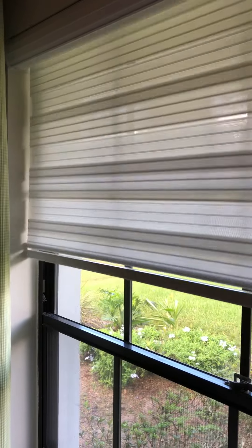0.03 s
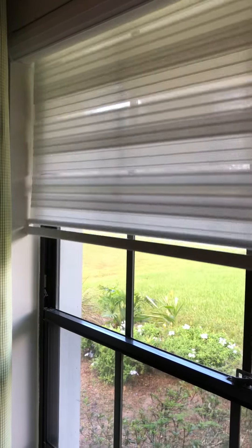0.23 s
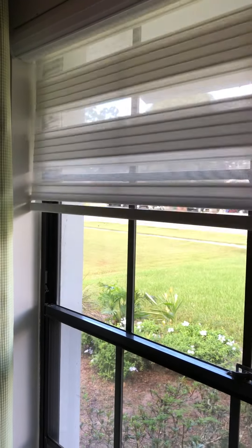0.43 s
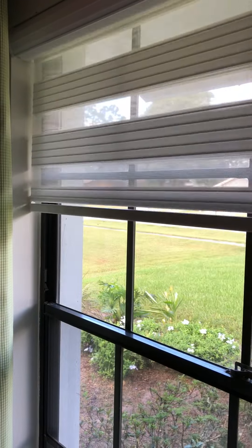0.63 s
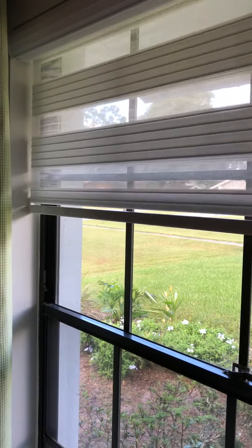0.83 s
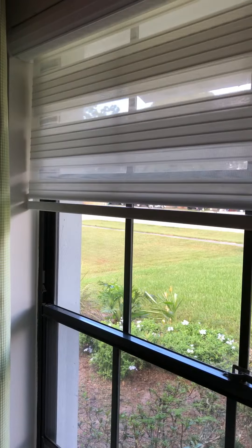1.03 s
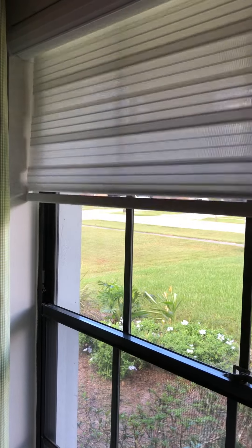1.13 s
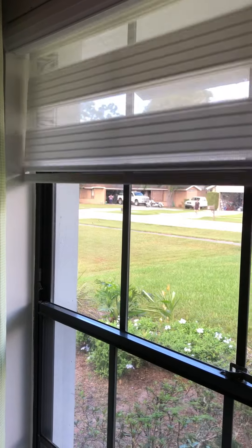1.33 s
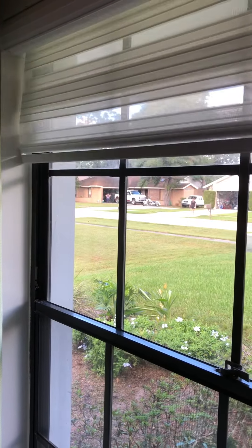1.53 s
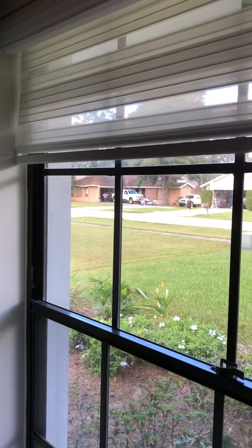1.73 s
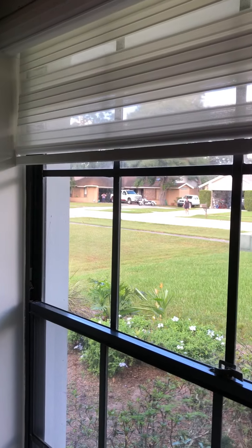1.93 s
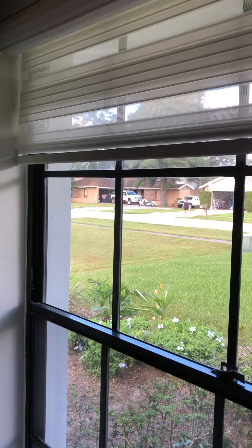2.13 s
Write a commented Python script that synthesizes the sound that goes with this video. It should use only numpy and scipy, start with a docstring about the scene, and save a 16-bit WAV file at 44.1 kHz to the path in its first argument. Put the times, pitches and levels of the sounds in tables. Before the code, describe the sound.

A roller window shade is pulled up in two rattling, ticking pulls, each ending in a knock

```python
"""Roller shade raised by bead chain

Two pulls in a small quiet room: beads tick as decaying modes, random slips excite the roller's resonances,
and fabric and chain hiss as fine grains. After each pull the mechanism catches with a knock of damped
frame modes and clicks of band noise. The tube thrums and the bearing chirps as swelling tones."""
import sys
import numpy as np
from scipy import signal
from scipy.fft import rfft, irfft, next_fast_len
from scipy.io import wavfile
from scipy.ndimage import uniform_filter1d

SR = 44100
rng = np.random.default_rng(int(sys.argv[2]) if len(sys.argv) > 2 else 0)


def materialize(psi):
    """Save the field psi as 16-bit PCM at rate SR to the path in sys.argv[1].

    A 1-D psi becomes a single channel; in a 2-D psi each row is a channel.
    """
    bounded = np.clip(np.atleast_2d(psi).T, -1, 1)
    quanta = np.round(bounded * 32767).astype(np.int16)
    wavfile.write(sys.argv[1], SR, quanta)


N = 97020  # samples, 2.2 s


def amp(db):
    """Decibels to gain."""
    return 10 ** (np.asarray(db) / 20)


def unit(x):
    """Scale to rms 1."""
    return x / np.sqrt(np.mean(x ** 2) + 1e-20)


def along(points, hz):
    """Interpolate (Hz, value) points on a log frequency axis."""
    f, v = np.transpose(points)
    return np.interp(np.log(hz + 1), np.log(f + 1), v)


def clock():
    """Time of each sample, s."""
    return np.arange(N) / SR


def level(rows):
    """Gain per sample from (s, dB) points, silent outside them."""
    s, db = np.transpose(rows)
    return amp(np.interp(clock(), s, db, left=-np.inf, right=-np.inf))


def filtered(x, response):
    """Multiply the spectrum of x by a complex response of frequency."""
    m = next_fast_len(N + SR // 2)
    hz = np.fft.rfftfreq(m, 1 / SR)
    return irfft(rfft(x, m) * response(hz), m)[:N]


def coloured(x, points):
    """Shape x by (Hz, dB) points, at rms 1."""
    return unit(filtered(x, lambda hz: amp(along(points, hz))))


def white():
    """Fresh white noise."""
    return rng.standard_normal(N)


def fade(t, t60):
    """Exponential decay of 60 dB in t60 from t = 0, silent before."""
    return (t >= 0) * np.exp(-np.log(1000) * np.maximum(t, 0) / t60)


def slips(per_s, spread_db):
    """Sparse impulses of random time, sign and size: tiny friction slips."""
    hits = rng.random(N) < per_s / SR
    return hits * np.sign(white()) * amp(spread_db * white())


def patchy(x):
    """Random swells that come and go in neighbouring bands, at rms 1."""
    spread_db, bins, frames = 1.8, 4, 7
    z = signal.stft(x, nperseg=512)[2]
    field = uniform_filter1d(rng.standard_normal(z.shape), bins, axis=0)
    field = uniform_filter1d(field, frames, axis=1)
    return unit(signal.istft(z * amp(spread_db * unit(field)), nperseg=512)[1][:N])


def swells(rows):
    """Tones that build up exponentially under friction and ring out."""
    out = np.zeros(N)
    for peak_s, db, hz, rise_s, t60 in rows:
        t = clock() - peak_s
        shape = np.exp(np.minimum(t, 0) / rise_s) * fade(np.maximum(t, 0), t60)
        out += amp(db) * np.sqrt(2) * shape * np.sin(2 * np.pi * (hz * t + rng.random()))
    return out


def bead_tick(t, modes):
    """One bead on the sprocket: slightly detuned damped modes plus a noise crack."""
    mode_scatter_db, mode_detune = 1, .015
    crack_db, crack_t60_s = -22, 0.0013
    tick = amp(crack_db) * fade(t, crack_t60_s) * rng.standard_normal(len(t))
    for hz, db, t60 in modes:
        gain = amp(db + mode_scatter_db * rng.normal())
        mode_hz = hz * (1 + mode_detune * rng.normal())
        tick += gain * fade(t, t60) * np.sin(2 * np.pi * (mode_hz * t + rng.random()))
    return tick


def beads():
    """Each bead ticks, harder as the chain runs faster, and jolts the roller, whose tube sings faintly."""
    # chain speed in each pull from its first bead: t/s, rate/(beads/s)
    pulls = [
        [(.0765, 28), (.15, 65.7), (.23, 85.4), (.275, 65.9), (.33, 69.5), (.43, 89.1), (.51, 95.2), (.56, 42)],
        [(1.122, 25.8), (1.18, 41.5), (1.25, 46.9), (1.31, 57.5), (1.45, 71), (1.53, 87.7), (1.58, 80.1),
         (1.67, 25.8)],
    ]
    # strike force per pull: tick level at usual rate/dB, rise/(dB per doubling of rate), scatter/dB
    strikes = [(-42.3, 7, 1.1), (-46.3, 3, 2.6)]
    # bead and sprocket modes: f/Hz, relative level/dB, T60/s
    modes = [(3600, -13, .008), (6400, -10, .006), (7300, 0, .008), (9000, -5, .008), (11400, -6, .008),
             (12750, -12, .009), (15250, -14, .008)]
    usual_beads_per_s = 75
    body_db, body_t60_s = -9, 0.018
    tube_hz, tube_t60_s, tube_db = 1851, 0.47, -4.5  # tube_db re rms of ticks

    ticks, jolts = np.zeros(N + SR), np.zeros(N + SR)
    t = np.arange(SR // 20) / SR
    for pull, (tick_db, speed_db, scatter_db) in zip(pulls, strikes):
        rate = np.interp(clock(), *np.transpose(pull), left=0, right=0)
        bead_count = np.ceil(np.cumsum(rate) / SR)
        for i in np.flatnonzero(np.diff(bead_count)):
            octaves = np.log2(rate[i + 1] / usual_beads_per_s)
            size = amp(tick_db + speed_db * octaves + scatter_db * rng.normal())
            ticks[i:i + len(t)] += size * bead_tick(t, modes)
            jolts[i:i + len(t)] += size * fade(t, body_t60_s)

    body = jolts[:N] * roller(white())
    tube = fade(clock(), tube_t60_s) * np.sin(2 * np.pi * tube_hz * clock())
    singing = signal.fftconvolve(jolts[:N] * white(), tube)[:N]
    return ticks[:N] + amp(body_db) * body + amp(tube_db) * np.std(ticks) * unit(singing)


def roller(force):
    """Tube and brackets under a force: a broad body plus a few narrower resonances."""
    # broad body: f/Hz, relative level/dB
    body_colour = [(71, -30), (120, -10), (156, -4.5), (190, -12.5), (272, -5.5), (475, -2), (607, 1),
                   (800, -1.5), (1040, -6.5), (1400, -5.5), (1570, -10), (2200, -15.5), (4300, -19),
                   (6000, -19.5), (9000, -38)]
    # resonances: f/Hz, bandwidth/Hz, relative level/dB
    resonances = [(363, 180, 5.5), (609.6, 11, 8), (872, 45, 2.5), (1107, 60, -0.5), (1250, 20, -30),
                  (1370, 200, -4.5), (2120, 104, -2.5)]
    body_db, ring_db = -2, -7

    def ring(f):
        return sum(amp(db) * 1j * f * w / (c * c - f * f + 1j * f * w) for c, w, db in resonances)

    return amp(body_db) * coloured(force, body_colour) + amp(ring_db) * unit(filtered(force, ring))


def rubbing():
    """Dense, uneven slips in the brackets excite the roller, over a low rumble of the turning tube."""
    # rubbing effort, one list per pull: t/s, drive level/dB
    efforts = [
        [(0, -65), (.06, -65), (.08, -56.5), (.16, -51.5), (.27, -47), (.36, -46), (.47, -48.5), (.51, -46),
         (.57, -51), (.645, -62.5), (.705, -52.5), (.72, -56)],
        [(1.03, -68.5), (1.09, -66), (1.14, -56), (1.19, -47.5), (1.27, -48.5), (1.38, -47.5), (1.55, -48),
         (1.63, -44.5), (1.71, -60.5), (1.76, -59.5), (1.80, -63.5)],
    ]
    # rumble spectrum: f/Hz, relative level/dB
    rumble_colour = [(25, -69), (55, -9.5), (85, 5), (125, -3), (160, -5.5), (200, -15.5), (400, -57.5)]
    slips_per_s, slip_spread_db, rumble_db = 2600, 3, -14
    effort = sum(level(pull) for pull in efforts)
    rub = roller(patchy(slips(slips_per_s, slip_spread_db)))
    rumble = amp(rumble_db) * coloured(white(), rumble_colour)
    return effort * (rub + rumble)


def hiss():
    """Fine grains of sliding fabric and chain."""
    # sliding: t/s, relative level/dB
    sliding = [(0, -74), (.07, -62.5), (.13, -51.5), (.22, -49), (.42, -49), (.51, -44), (.55, -50),
               (.61, -74), (.68, -64.5), (.86, -61), (.98, -70.5), (1.08, -72.5), (1.18, -56), (1.25, -57),
               (1.35, -49.5), (1.45, -49), (1.54, -45.5), (1.63, -52.5), (1.70, -65.5), (1.74, -63),
               (1.83, -65.5), (2.02, -60.5), (2.1, -65), (2.15, -75.5), (2.2, -64)]
    # hiss spectrum: f/Hz, relative level/dB
    colour = [(500, -8), (1500, 5), (2600, 1), (3700, 1), (5300, -2.5), (7300, -3.5), (9200, -5.5),
              (10400, -10), (11400, -11.5), (12200, -10), (15500, -12.5)]
    hiss_db, grains_per_s, spread_db = -1.5, 6000, 0.5
    return amp(hiss_db) * level(sliding) * coloured(slips(grains_per_s, spread_db), colour)


def knocks():
    """The mechanism bumps the frame, whose modes ring briefly over a longer, low noisy shudder."""
    # knocks: t/s, level/dB, tilt of frame modes/(dB/octave), shudder relative level/dB
    bumps = [(0.7153, -26.5, -2.5, -10.5), (1.038, -48, -14, -25), (1.108, -51.5, -10, -18),
             (1.761, -39.5, -11, -11.5)]
    # frame modes: f/Hz, relative level/dB, T60/s
    frame = [(243.5, -16, 0.11), (332.4, 2, 0.042), (364, 1, 0.03), (539, -10.5, 0.15), (589, 8, 0.037),
             (1274, -6.5, 0.032), (1773, -5, 0.051)]
    # shudder spectrum: f/Hz, relative level/dB
    shudder_colour = [(25, -40), (45, -11), (110, 4), (135, -6.5), (157, 8), (190, -5.5), (260, 0),
                      (320, 0.5), (420, -3), (560, -16), (800, -13.5), (1800, -19.5), (4000, -55)]
    attack_s, shudder_rise_s, shudder_t60_s = 0.0033, 0.013, 0.35
    tilt_ref_hz = frame[1][0]
    out = np.zeros(N)
    for s, db, tilt_db, shudder_db in bumps:
        t = np.maximum(clock() - s, 0)
        ring = np.zeros(N)
        for hz, mode_db, t60 in frame:
            gain = amp(mode_db + tilt_db * np.log2(hz / tilt_ref_hz))
            ring += gain * fade(t, t60) * np.sin(2 * np.pi * hz * t)
        swell = (1 - np.exp(-t / shudder_rise_s)) * fade(t, shudder_t60_s)
        shudder = amp(shudder_db) * swell * coloured(white(), shudder_colour)
        out += amp(db) * (1 - np.exp(-t / attack_s)) * (ring + shudder)
    return out


def clicks():
    """Catch and snagging beads: short plastic clicks, each a decaying band of noise."""
    # clicks: t/s, level/dB, centre f/Hz, T60/s, Gaussian half-width/octave
    bursts = [(0.7124, -43.5, 10000, 0.032, 0.29), (0.7137, -46, 3020, 0.084, 0.59),
              (0.7184, -38.5, 5130, 0.037, 0.43), (0.734, -45, 4370, 0.02, 0.23),
              (.742, -51.5, 4350, 0.12, 0.3), (1.006, -63.5, 3230, 0.072, .5),
              (1.008, -54.5, 694, 0.081, 1.12), (1.4057, -53, 7500, .008, 0.43),
              (1.5353, -36.5, 7600, 0.0062, 0.38), (1.7214, -62, 9900, 0.07, 0.91),
              (1.759, -53.5, 3800, .04, .7), (1.7702, -45, 4830, 0.023, 1.3),
              (2.188, -57.5, 700, 0.14, 0.5)]
    out = np.zeros(N)
    for s, db, hz, t60, octaves in bursts:
        band = filtered(white(), lambda f: np.exp(-.5 * (np.log2((f + 1) / hz) / octaves) ** 2))
        out += amp(db) * fade(clock() - s, t60) * unit(band)
    return out


def chirps():
    """Short stick-slip tones of the bearing."""
    # chirps: peak t/s, level/dB, f/Hz, rise/s, T60/s
    tones = [(.262, -47.5, 595, 0.033, 0.21), (.553, -35, 985, 0.002, 0.049),
             (1.012, -51.5, 942, 0.0024, 0.034), (1.197, -44.5, 752, 0.012, 0.045),
             (1.59, -38, 659, 0.0079, .05), (2.195, -59.5, 796, 0.0036, 0.067)]
    return swells(tones)


def thrums():
    """Low tones of the tube under load."""
    # thrums: peak t/s, level/dB, f/Hz, rise/s, T60/s
    tones = [(.01, -54, 93, 0.03, 0.17), (.115, -55.5, 105, 0.0084, 0.27), (.24, -50, 84, 0.037, 0.15),
             (.43, -54.5, 77.6, 0.023, 0.23), (.538, -45, 94, 0.019, 0.17), (.742, -44.5, 103, 0.0027, .12),
             (.77, -54.5, 73.6, 0.018, 0.75), (1.58, -47.5, 92.3, 0.051, 0.55)]
    return swells(tones)


def room(x):
    """Room reverberation: x convolved with a noise tail, each frequency dying at its own speed."""
    # decay time: f/Hz, T60/s
    decay = [(100, 1), (500, 0.41), (2000, 0.15), (6000, 0.34), (15000, 0.34)]
    hz, t, z = signal.stft(rng.standard_normal(SR // 2), SR, nperseg=256)
    decaying = z * fade(t, along(decay, hz)[:, None])
    tail = signal.istft(decaying, SR, nperseg=256)[1]
    delayed = np.pad(tail, (SR // 250, 0))  # 4 ms
    return signal.fftconvolve(x, delayed / np.linalg.norm(tail))[:N]


def quiet_floor():
    """Steady coloured noise of the quiet room."""
    # floor spectrum: f/Hz, relative level/dB
    colour = [(15, -18), (35, -14), (55, -0.5), (120, -14.5), (300, -16), (1000, -21), (4000, -52),
              (15000, -39)]
    return amp(-66) * coloured(white(), colour)


def scene():
    """The shade, its room and the room's quiet floor."""
    running_room_db, catch_room_db = -12, -10.5
    running = beads() + rubbing() + hiss()
    catching = knocks() + clicks() + chirps()
    echo = room(amp(running_room_db) * running + amp(catch_room_db) * catching)
    return (running + catching + thrums() + echo + quiet_floor())[None]


def record(dry):
    """Remove everything from the band limit up."""
    top_hz = 15850
    return filtered(dry[0], lambda hz: hz < top_hz)[None]


dry = scene()
out = record(dry)
materialize(out)
```